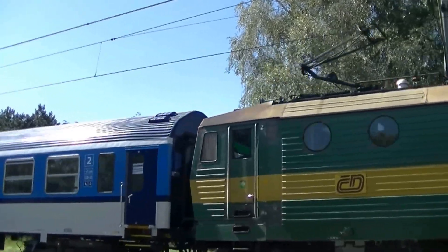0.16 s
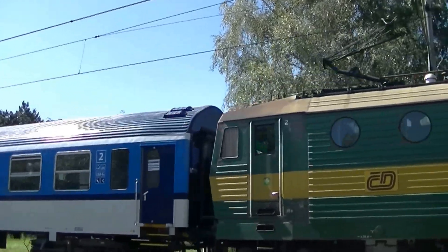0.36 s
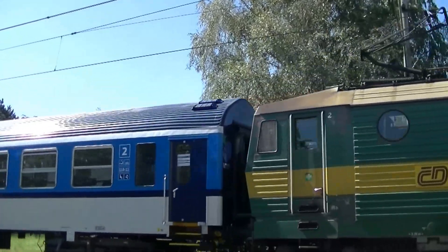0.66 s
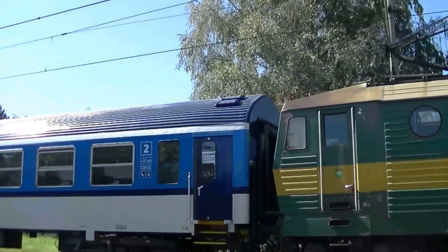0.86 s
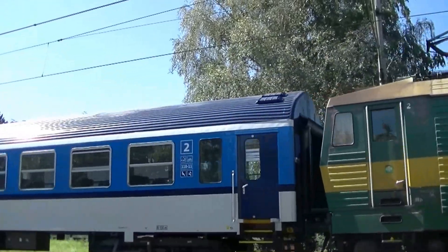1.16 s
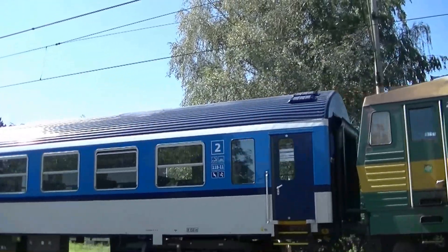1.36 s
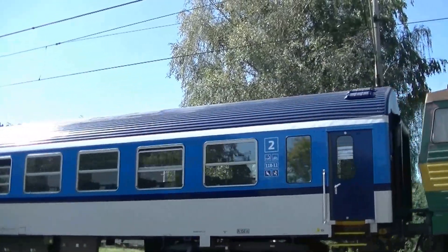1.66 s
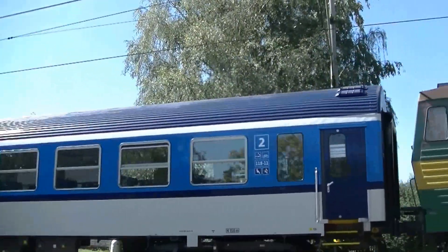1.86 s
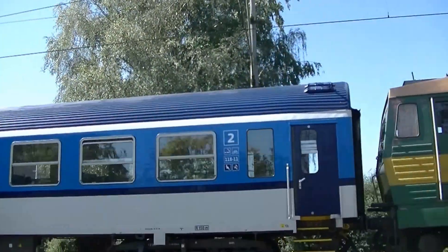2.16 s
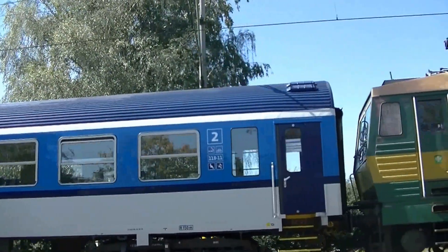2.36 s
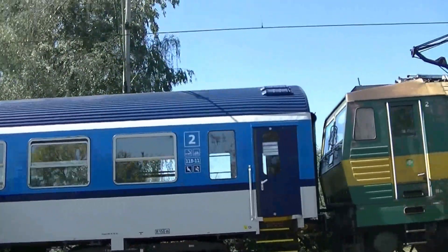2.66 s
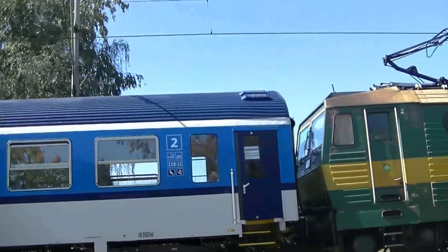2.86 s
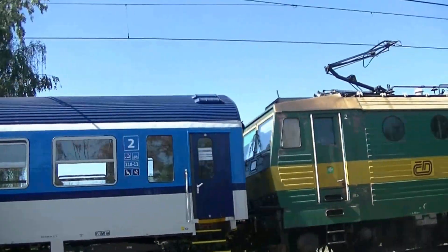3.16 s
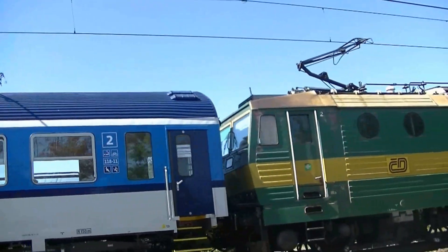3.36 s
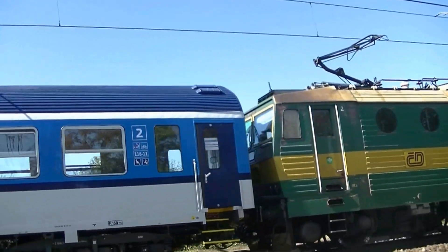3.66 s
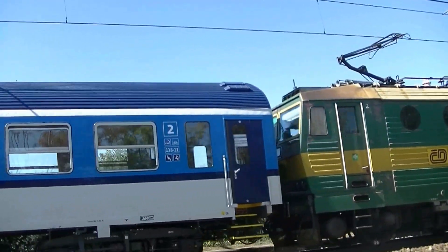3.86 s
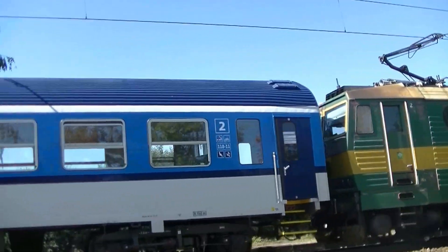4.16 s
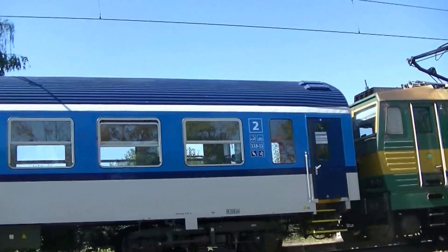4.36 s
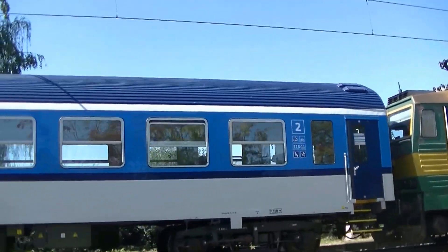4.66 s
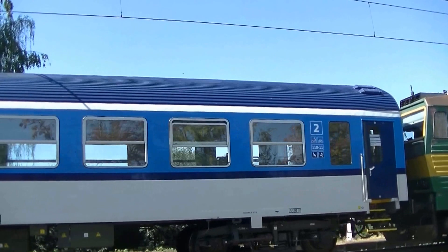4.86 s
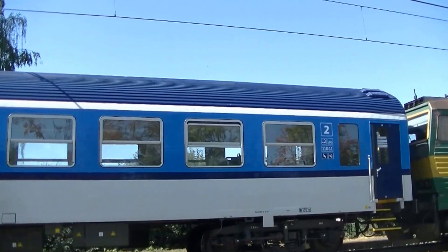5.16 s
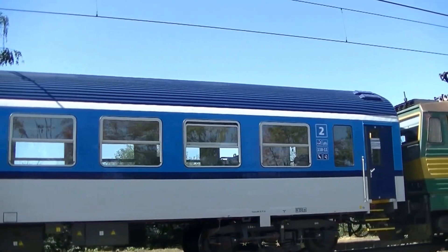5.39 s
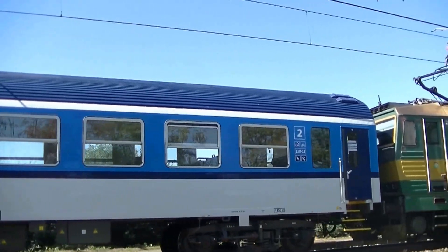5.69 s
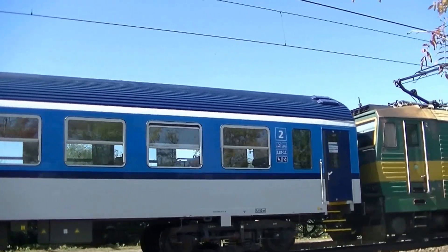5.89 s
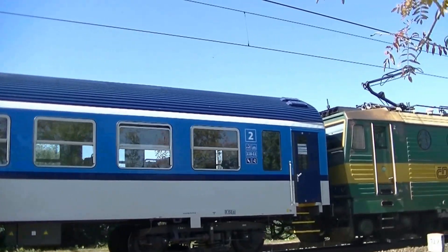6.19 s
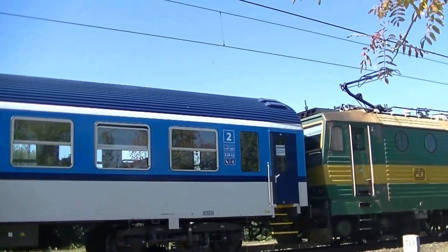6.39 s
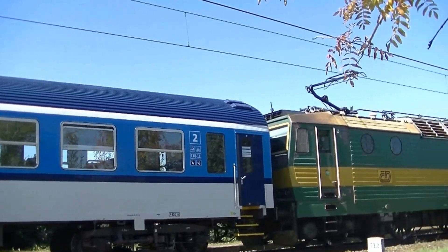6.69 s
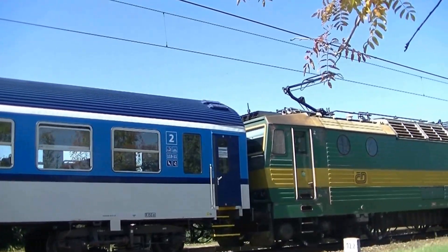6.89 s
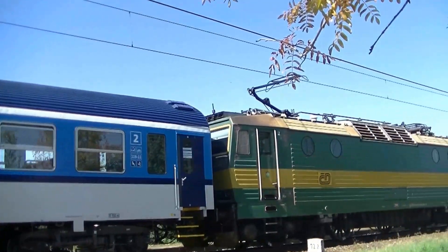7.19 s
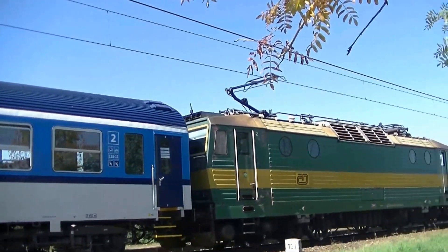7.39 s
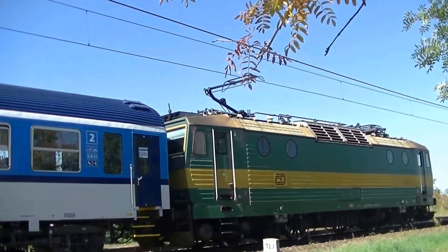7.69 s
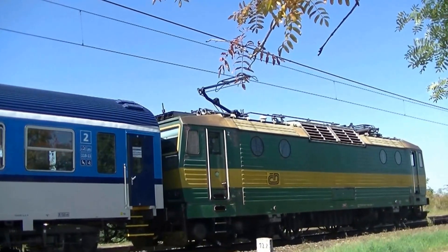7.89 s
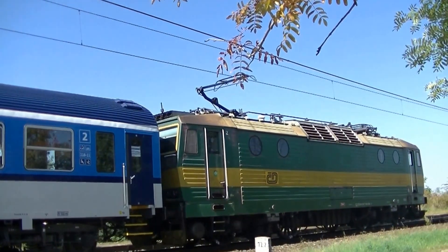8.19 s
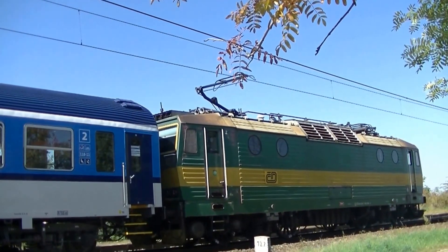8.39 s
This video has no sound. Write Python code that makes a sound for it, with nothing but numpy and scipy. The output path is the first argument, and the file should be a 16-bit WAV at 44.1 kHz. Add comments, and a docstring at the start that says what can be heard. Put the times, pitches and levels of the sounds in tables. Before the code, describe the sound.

Outdoors close beside the track, an electric locomotive and its coaches brake to a halt. A shrill, beating squeal from many wheels dominates, with gritty scraping and fading wheel rumble beneath. It intensifies past halfway, then falters and breaks into lower squeals and brief hoots. After the wheels stop, a thin ringing dies away and the blowers' steady hum and airy rush swell back.

```python
"""Brake blocks squeal on one wheel mode, grind, and groan as an electric locomotive and its train halt.
The squeal is a chorus of beating wheels; a lower mode flares in bursts, and short hoots glide in pitch.
Grinding is noise through wheel resonances; the locomotive adds blower, drive and gear tones and wheel rumble.
Gain control ducks everything under the squeal; after the stop the blowers swell back."""
import sys
import numpy as np
from scipy import signal
from scipy.fft import rfft, irfft, next_fast_len
from scipy.io import wavfile
from scipy.ndimage import uniform_filter1d, minimum_filter1d, map_coordinates

SR = 44100
rng = np.random.default_rng(int(sys.argv[2]) if len(sys.argv) > 2 else 0)


def transcribe(u):
    """Save the signal u as a 16-bit wav file named by the first command-line argument.

    u: samples, shape (n,) or (channels, n), limited to [-1, 1]; the rate is SR.
    q: integer samples, one column per channel.
    """
    v = np.clip(np.atleast_2d(u).T, -1, 1)
    q = np.round(v * 32767).astype(np.int16)
    wavfile.write(sys.argv[1], SR, q)


N = 376613
TIME = np.arange(N) / SR  # seconds


def amp(db):
    """Decibels to a linear factor."""
    return 10 ** (np.asarray(db) / 20)


def unit(x):
    """Scale to rms 1."""
    return x / np.sqrt(np.mean(np.abs(x) ** 2) + 1e-20)


def along(points, hz):
    """Read a curve of (Hz, value) points on a log frequency axis."""
    point_hz, values = np.transpose(points)
    return np.interp(np.log(hz + 1), np.log(point_hz), values)


def curves(rows):
    """One value per sample for each column after the time."""
    seconds, *columns = np.transpose(rows)
    return [np.interp(TIME, seconds, column) for column in columns]


def wobble(rate):
    """A smooth random curve, rate knots a second."""
    coarse = TIME[::16]
    knots = rng.standard_normal(8192)
    return np.interp(TIME, coarse, map_coordinates(knots, [coarse * rate], mode="mirror"))


def phase_of(hz):
    """Running phase of a moving frequency, from a random start."""
    return 2 * np.pi * (np.cumsum(hz) / SR + rng.random())


def filtered(x, response):
    """Filter x with a response given as a function of frequency."""
    padded = next_fast_len(N + SR // 4)
    spectrum = rfft(x, padded) * response(np.fft.rfftfreq(padded, 1 / SR))
    return irfft(spectrum, padded)[..., :N]


def arch(start, length):
    """A rounded swell from 0 to 1 and back."""
    return np.sqrt(np.abs(np.sin(np.pi * np.clip((TIME - start) / length, 0, 1))))


def swells(rows):
    """The sum of rounded swells, or dips, given as (start, length, height) rows."""
    return sum(height * arch(start, length) for start, length, height in rows)


# Likeness of left and right in the noise. Each row: frequency in Hz, correlation from -1 to 1.
STEREO_LIKENESS = [(300, 1), (1400, 0.99), (3100, 0.95), (6800, 0.74), (10000, 0.012), (15000, -0.55)]


def rush(colour):
    """Stereo noise of rms 1, near mono in the bass, coloured by a function of frequency."""
    def mid_side_response(hz):
        angle = np.arccos(np.clip(along(STEREO_LIKENESS, hz), -1, 1)) / 2
        return colour(hz) * np.array([np.cos(angle), np.sin(angle)])

    mid, side = filtered(rng.standard_normal((2, N)), mid_side_response)
    return unit(np.array([mid + side, mid - side]))


def shaped(points):
    """Stereo noise of rms 1 with a spectrum of (Hz, dB) points."""
    return rush(lambda hz: amp(along(points, hz)))


def tones(lines, waver_hz, flutter_db=4.0):
    """Machine lines, unsteady in pitch and strength."""
    total = 0
    for hz, db in lines:
        strength = amp(db + flutter_db * wobble(12))
        total = total + strength * np.sqrt(2) * np.sin(phase_of(hz + waver_hz * wobble(25)))
    return total


# Decay of the trackside scatter. Each row: frequency in Hz, time to fall 60 dB in seconds.
TRACKSIDE_DECAY = [(300, 0.36), (4800, 0.32), (12000, 0.033)]


def echoes(x, wet_db, width):
    """A mono sound plus its scatter from coach sides, ballast and trees: decaying noise, shorter in the treble."""
    hz, t, noise = signal.stft(rng.standard_normal((2, SR // 2)), SR, nperseg=256)
    decay = amp(-60 * t / along(TRACKSIDE_DECAY, hz)[:, None])
    tail = signal.istft(noise * decay, SR, nperseg=256)[1]
    tail = tail / np.linalg.norm(tail[0])
    mid, side = amp(wet_db) * signal.fftconvolve(x[None], tail, axes=1)[:, :N]
    return np.array([x + mid + width * side, x + mid - width * side]) / np.sqrt(1 + amp(wet_db) ** 2)


START_M_PER_S, BRAKING_M_PER_S2, CREEP_M_PER_S = 5.6, .78, 0.365


def train_speed():
    """Even braking down to a creep in m/s, held from there; the fades after STOP_S make the halt."""
    return np.maximum(START_M_PER_S - BRAKING_M_PER_S2 * TIME, CREEP_M_PER_S)


STOP_S = 6.74


def since_stop():
    """Seconds since the wheels stopped, zero before."""
    return np.maximum(TIME - STOP_S, 0)


# How hard the blocks drive the wheels, for squeal and grinding alike. Each row: time in seconds, level in dB.
BRAKE_DRIVE = [(0, -7), (1.3, -6.5), (1.9, -4), (4.05, 1), (4.5, 7), (6.2, 7), (6.75, -2.5)]


def brake_drive_db():
    """The drive of the blocks on the wheels, in dB."""
    return curves(BRAKE_DRIVE)[0]


# Brief falters of the squeal. Each row: middle in seconds, half width in seconds, depth in dB.
SQUEAL_FALTERS = [(4.88, .08, 4), (5.35, 0.11, 6), (5.991, 0.022, 8), (6.12, 0.031, 9.5),
                  (6.307, 0.028, 16), (6.5, 0.035, 11.5), (6.83, 0.045, 6)]


def falter_db():
    """How far the squeal has sunk in its brief falters."""
    return sum(depth_db * np.exp(-((TIME - s) / width) ** 2) for s, width, depth_db in SQUEAL_FALTERS)


MOTION_RELEASE_DB_PER_S = 148  # fall of everything driven by rubbing or rolling, after the stop


def motion_release():
    """The quick fall, as a factor, once the wheels stand still."""
    return amp(-MOTION_RELEASE_DB_PER_S * since_stop())


# Blower hum. Each row: frequency in Hz, rms level in dB before flutter and nearness.
BLOWER_HUM = [(220.7, -42), (312.2, -40.5), (414.5, -46), (686.5, -38.5), (790, -52), (918, -49.5),
              (1373, -48.5), (2826, -46.5), (3531, -57), (4129, -51.5), (4323, -46), (5233, -50.5),
              (14190, -66)]
# Lines from the 300 Hz ripple of the drive. Each row: frequency in Hz, relative level in dB.
DRIVE_WHINE = [(5981, -51), (7499, -56), (7773, -52), (8070, -55), (8355, -58)]
# Colour of the blowers' rushing air. Each row: frequency in Hz, relative density in dB per Hz.
BLOWER_COLOUR = [(20, -38.5), (50, -12), (100, -5.5), (230, -1.5), (340, -1.5), (400, -11.5), (650, -5.5),
                 (1080, -15), (1400, -12), (3200, -14.5), (5200, -9), (7000, -24.5), (9300, -34),
                 (15000, -29.5)]
# Colour of the wheel rumble. Each row: frequency in Hz, relative density in dB per Hz.
RUMBLE_COLOUR = [(20, -25.5), (50, -12.5), (150, -0.5), (320, -12.5), (385, -19.5), (500, -3), (690, -11),
                 (780, -30), (900, -27.5), (1000, -12), (1300, -18), (2200, -16), (4000, -20),
                 (12000, -32.5)]
# Nearness of the locomotive, carried by its blowers. Each row: time in seconds, lift in dB.
BLOWER_NEARNESS = [(0, 2.5), (2.7, 3), (5, 1.5), (6.75, -2), (8.54, 0.5)]
# Rumble swells as a bogie rolls past. Each row: start in seconds, length in seconds, swell in dB.
BOGIE_PASSES = [(.03, .4, 6), (.95, .43, 5.5)]


def locomotive(air_db=-24.5, drive_db=10, rolling_db=-23, gear_db=-32, mesh_hz=94, rolling_growth=0.83):
    """Blowers run throughout; drive whine, gear whine and wheel rumble fade with speed."""
    speed = train_speed()
    near_db, = curves(BLOWER_NEARNESS)
    motion = speed / speed[0] * motion_release()
    blowers = amp(air_db + near_db + 0.21 * wobble(8)) * shaped(BLOWER_COLOUR)
    hum = amp(near_db) * tones(BLOWER_HUM, waver_hz=2.5)
    drive = amp(drive_db) * motion ** 2 * tones(DRIVE_WHINE, waver_hz=20)
    # the gears mesh at mesh_hz for each m/s, so their whine sinks
    gears = motion ** 3 * tones([(mesh_hz * speed, gear_db)], waver_hz=16.2)
    rumble_level = amp(rolling_db + swells(BOGIE_PASSES) + 1.8 * wobble(9))
    rolling = rumble_level * motion ** rolling_growth * shaped(RUMBLE_COLOUR)
    return blowers + hum + drive + gears + rolling


# Colour of the rubbing blocks. Each row: frequency in Hz, relative density in dB per Hz.
RUBBING_COLOUR = [(400, -19), (1100, -26), (1450, -16.5), (2000, -11.5), (3200, -4.5), (4200, -11.5),
                  (4750, 1.5), (5300, -1.5), (5900, -19.5), (7100, -8), (8000, -14.5), (9000, -19),
                  (13500, -24.5), (14400, -26.5), (15500, -38.5)]
# Wheel resonances excited by the rubbing. Each row: frequency in Hz, width in Hz, relative level in dB.
WHEEL_RESONANCES = [(2375, 20, 1), (3265, 19, 5.5), (4104, 52, 3.5), (6530, 220, -6.5), (6840, 53, -4.5),
                    (7190, 50, -5), (7950, 61, -6.5)]
# Brief changes in the rubbing. Each row: start in seconds, length in seconds, change in dB (negative is quieter).
RUBBING_CHANGES = [(3.16, 0.12, 5.5), (4.558, 0.15, 4.5), (4.94, .11, 1), (5.3, 0.14, -1), (6.14, .1, 4.5)]
GRIND_DB = -20  # rubbing against the brake drive
GRIP_SHARE = 0.1  # how much of each falter is a lost grip, which quiets the rubbing too


def wheel_resonance(hz):
    """Band-pass resonances of the wheel, summed with alternating sign."""
    total = 0
    for k, (centre, width, db) in enumerate(WHEEL_RESONANCES):
        damping = 1j * hz * width
        total = total + (-1) ** k * amp(db) * damping / (centre * centre - hz * hz + damping)
    return total


def grind(ring_db=-6, chatter_db=1.5):
    """Iron blocks scrape the treads and ring the wheels, as hard as the brake presses."""
    level_db = GRIND_DB + brake_drive_db() + swells(RUBBING_CHANGES) - GRIP_SHARE * falter_db()
    level = amp(level_db + chatter_db * wobble(30)) * motion_release()
    return level * (shaped(RUBBING_COLOUR) + amp(ring_db) * rush(wheel_resonance))


# Short hoots of sticking and slipping blocks, and a last flare of the squeal's octave near 9540 Hz.
# Each row: start in seconds, length in seconds, first pitch in Hz, last pitch in Hz, level in dB,
# second harmonic against the fundamental in dB.
GROANS_AND_FLARE = [(4.96, .08, 2550, 2565, -13, -25), (5.65, .27, 2550, 2560, -25, -25),
                    (5.84, .09, 1880, 1910, -26, -12), (6.085, .07, 1905, 1885, -13, -6),
                    (6.11, .15, 1604, 1598, -13.5, 3.5), (6.15, .08, 1830, 1805, -17, -5),
                    (6.17, .07, 2945, 2950, -19, -20), (6.5, .08, 1870, 1920, -19, 2),
                    (6.55, .14, 5402, 5396, -28, -30), (6.57, .12, 1945, 1890, -17.5, -11),
                    (6.57, .11, 3020, 3028, -18, -30), (6.64, .08, 1598, 1610, -27, 7),
                    (6.64, .12, 9539, 9540, -23, -60)]


def groans(jitter=0.0027, upper_db=-10):
    """Before the stop, sticking and slipping blocks hoot with overtones, and the squeal's octave flares once."""
    out = np.zeros(N)
    for start, length, first_hz, last_hz, db, second_db in GROANS_AND_FLARE:
        progress = np.linspace(0, 1, round(length * SR))
        glide_hz = first_hz + (last_hz - first_hz) * progress
        phase = phase_of(glide_hz * (1 + jitter * wobble(257)[:len(progress)]))
        upper = amp(upper_db) * (np.sin(3 * phase) + .5 * np.sin(4 * phase))
        tone = np.sin(phase) + amp(second_db) * (np.sin(2 * phase) + upper)
        envelope = np.sqrt(2 * np.abs(np.sin(np.pi * progress)))
        out[round(start * SR):][:len(progress)] += amp(db) * envelope * tone
    return echoes(out, wet_db=-5.5, width=0.24)


SQUEAL_HZ, SQUEAL_HZ_PER_M_S = 4760.5, 4.5  # the wheel mode at rest, and its rise with speed


def squeal_pitch():
    """The wheel mode sinks a little as the train slows."""
    return SQUEAL_HZ + SQUEAL_HZ_PER_M_S * train_speed()


# Bursts of the lower wheel mode. Each row: start in seconds, length in seconds, level in dB.
LOW_SQUEAL_BURSTS = [(4.52, 0.33, -23.5), (4.814, 0.069, -24), (4.92, 0.074, -25), (5.17, 0.12, -24),
                     (5.564, .13, -29), (5.813, 0.14, -18), (6.06, 0.16, -22), (6.37, 0.15, -26)]
LOW_SQUEAL_DB = -37  # faint singing between the bursts
LOW_SQUEAL_M_PER_S, LOW_SQUEAL_SPREAD_M_PER_S = 1.35, .75  # the speeds at which it sings


def low_squeal(jitter_hz=19, third_db=-10, fourth_db=-12):
    """At walking pace a mode an octave lower joins in, rich in overtones, and flares in bursts."""
    off_pace = (train_speed() - LOW_SQUEAL_M_PER_S) / LOW_SQUEAL_SPREAD_M_PER_S
    steady = amp(LOW_SQUEAL_DB) * np.exp(-off_pace ** 4) * motion_release()
    bursts = sum(amp(db) * arch(start, length) for start, length, db in LOW_SQUEAL_BURSTS)
    strength = np.hypot(steady, bursts) * amp(2.5 * wobble(28))
    phase = phase_of(squeal_pitch() / 2 + jitter_hz * wobble(150))
    song = np.sin(phase) + amp(third_db) * np.sin(3 * phase) + amp(fourth_db) * np.sin(4 * phase)
    return echoes(strength * np.sqrt(2) * song, wet_db=-2.0, width=0.57)


RELEASE_DB_PER_S, RING_DB, RING_DB_PER_S = 119, -21, 27  # a quick fall, then the free wheels ring on


def squeal_gain():
    """The squeal follows the brake, falters now and then, and rings out after the stop."""
    quick_fall = amp(-RELEASE_DB_PER_S * since_stop())
    ringing = amp(RING_DB - RING_DB_PER_S * since_stop())
    return amp(brake_drive_db() - falter_db()) * np.hypot(quick_fall, ringing)


# Where the squeal sits. Each row: time in seconds, right minus left in dB.
SQUEAL_PLACE = [(0, 0.5), (5.7, -0.16), (6.7, 0.5)]


def squeal(count=9, doppler_hz=17, wander_hz=11.5, rasp_hz=6.8, nearest_db=1.5, nearest_place=.3,
           second_db=-34, third_db=-42, skirt_db=-26, skirt_growth=0.76):
    """Many wheels sing on the same mode; speed spreads their pitches, so their beating slows with the train."""
    speed, pitch = train_speed(), squeal_pitch()
    right_db, = curves(SQUEAL_PLACE)
    unrest = np.sqrt(speed)
    # slow sliding grips harder and sharpens the wave
    octave = amp(second_db) / np.hypot(1, (speed / 2) ** 2)

    def wheel(place):
        """One wheel: a pitch shift by its place along the train, a wandering grip and a fast rasp."""
        drift_hz = unrest * (doppler_hz * place + wander_hz * wobble(55))
        phase = phase_of(pitch + drift_hz + speed * rasp_hz * wobble(400))
        return np.sin(phase) + octave * np.sin(2 * phase) + amp(third_db) * np.sin(3 * phase)

    chorus = unit(sum(wheel(place) for place in np.linspace(-1, 1, count)))
    nearest = amp(nearest_db) * unit(wheel(nearest_place))
    song = echoes(chorus + nearest, wet_db=-5.5, width=0.32)
    # the brake force sets the power; only beats quicker than 50 ms or so remain
    power = uniform_filter1d(np.mean(song ** 2, axis=0), SR // 20)
    song = song / np.sqrt(np.abs(power) + 1e-9)
    # fast sliding frays the tone into a band of hiss
    hiss = rush(lambda hz: 1 / (1 + ((hz - 4850) / 620) ** 2))
    skirt = amp(skirt_db) * speed ** skirt_growth * hiss
    return squeal_gain() * amp(right_db * np.array([[-.5], [.5]])) * (song + skirt)


def scene(lead_s=7e-6):
    """The whole train, a little louder on the right; it reaches two microphone ports a moment apart."""
    train = locomotive() + grind() + groans() + low_squeal() + squeal()
    lead = lead_s * np.array([[1], [-1]])  # half of this each way
    return filtered(train * amp([[-.75], [.75]]), lambda hz: np.exp(1j * np.pi * hz * lead))


def held(excess, release):
    """Follows every rise at once and falls back exponentially, release in seconds."""
    return np.exp(np.maximum.accumulate(np.log(excess + 1e-6) + TIME / release) - TIME / release)


TOP_HZ = 15500


def record(dry, ceiling_db=-4, quick_release=0.16, slow_release=0.3, slow_share=0.63):
    """Gain control that holds briefly, then recovers in a quick and a slow stage; then the band limit."""
    hold, attack = SR // 22, SR // 200  # samples
    # the running maximum is the negated minimum of the negated level
    peak = -minimum_filter1d(-np.abs(dry).max(axis=0), hold, origin=hold // 2 - attack // 2)
    excess_db = np.maximum(20 * np.log10(peak + 1e-9) - ceiling_db, 0)
    cut_db = np.maximum(held(excess_db, quick_release), slow_share * held(excess_db, slow_release))
    out = dry * amp(-uniform_filter1d(cut_db, attack))
    return filtered(out, lambda hz: 1 / (1 + (hz / TOP_HZ) ** 120))


dry = scene()
out = record(dry)
transcribe(out)
```